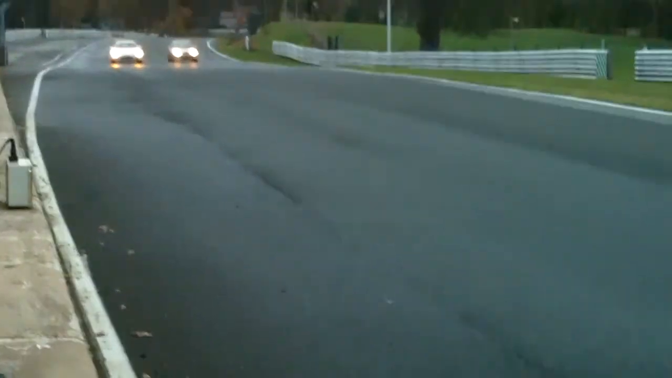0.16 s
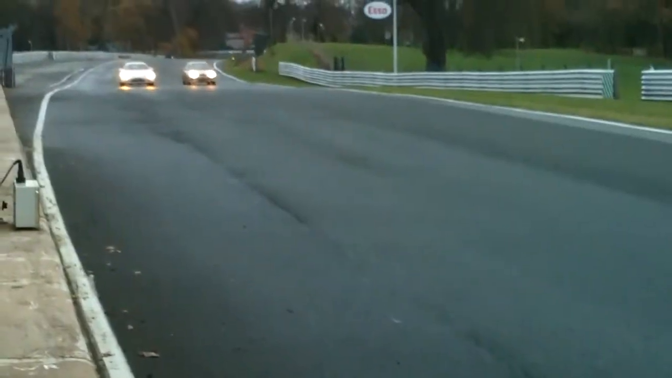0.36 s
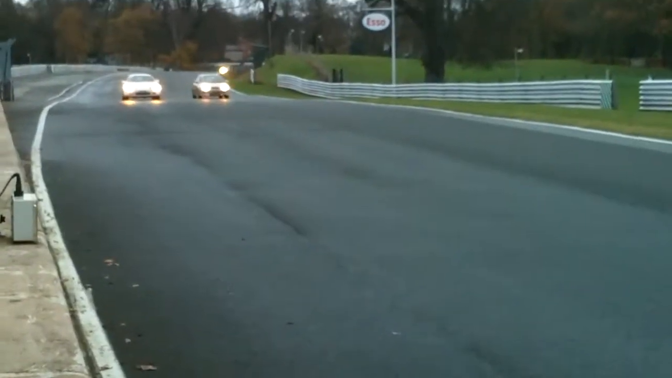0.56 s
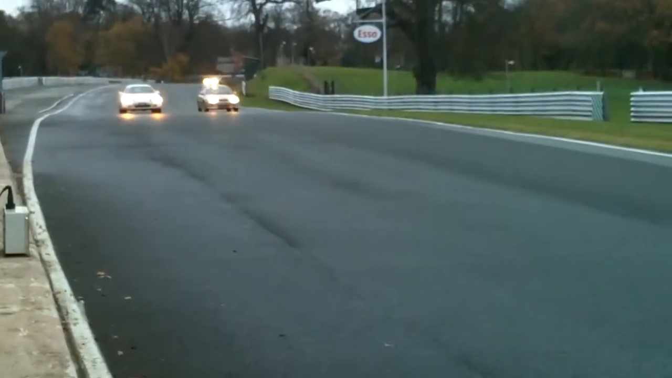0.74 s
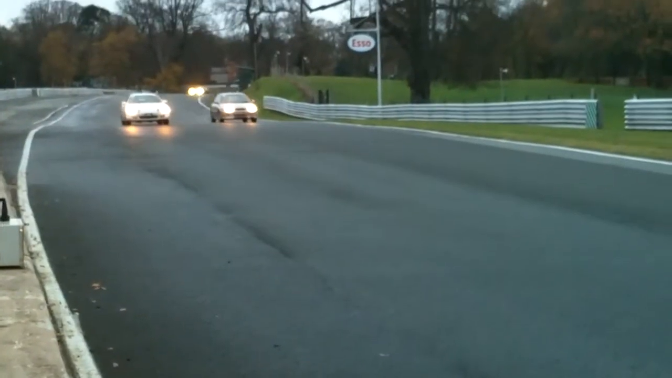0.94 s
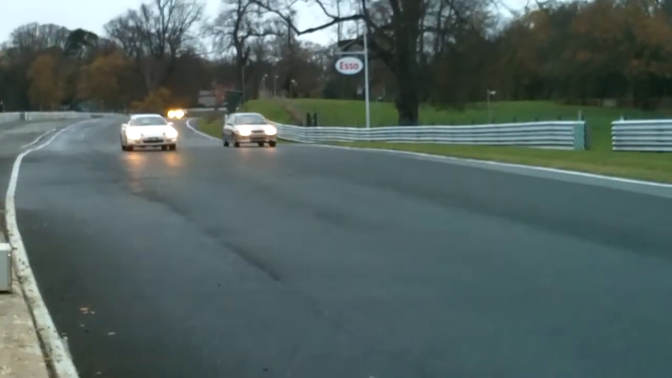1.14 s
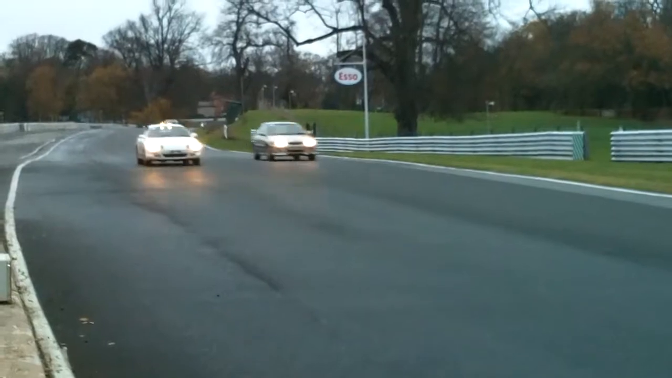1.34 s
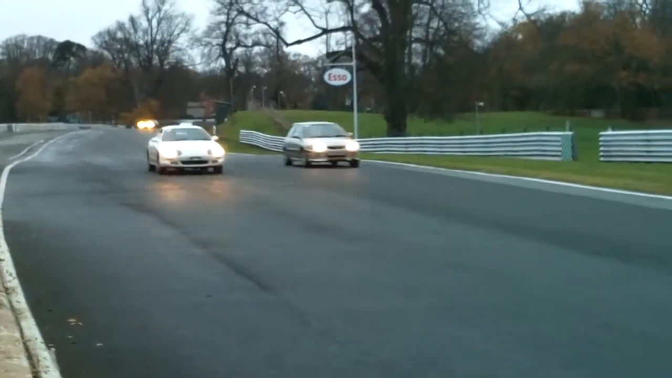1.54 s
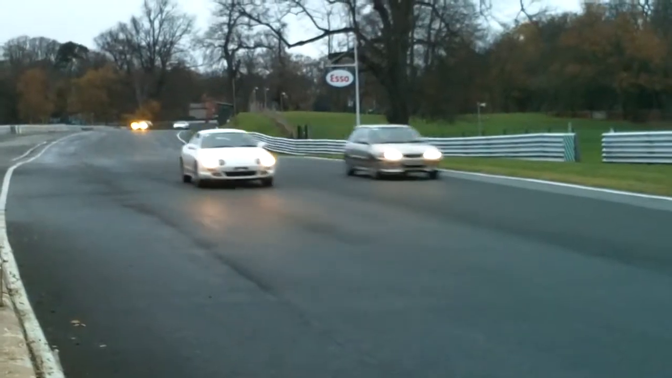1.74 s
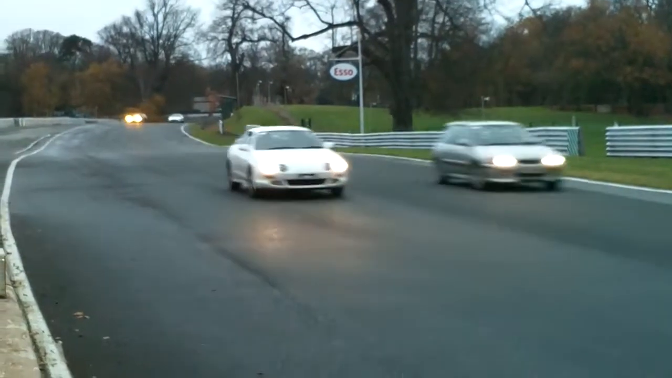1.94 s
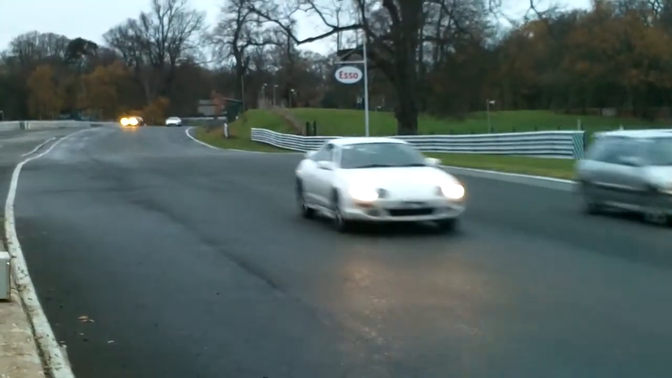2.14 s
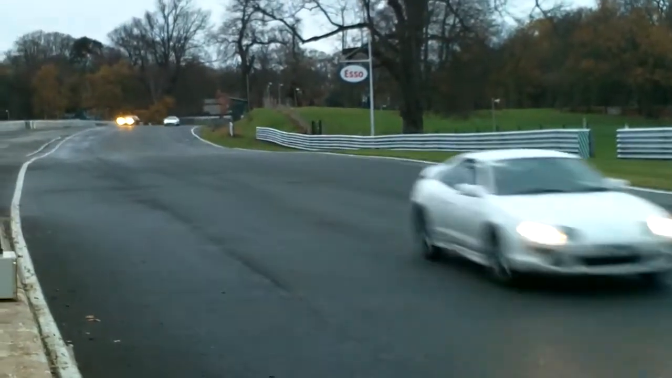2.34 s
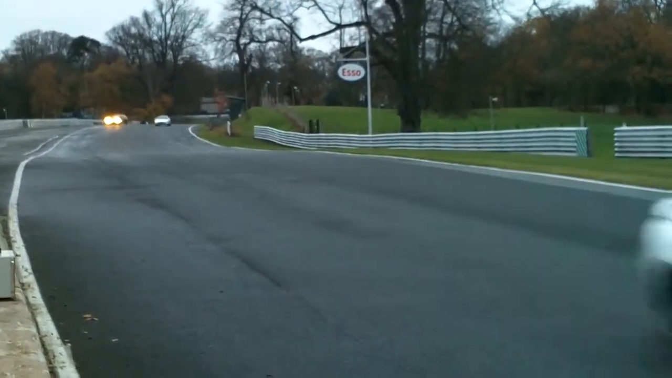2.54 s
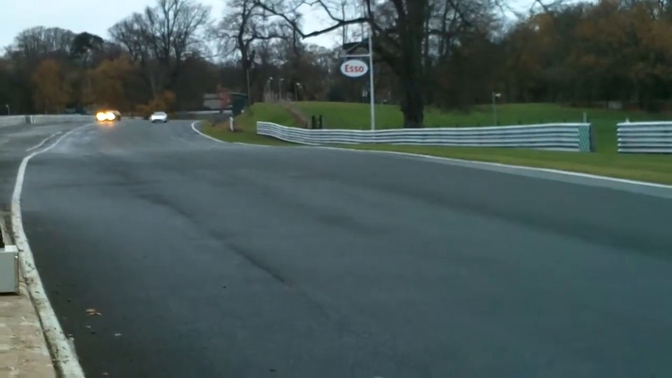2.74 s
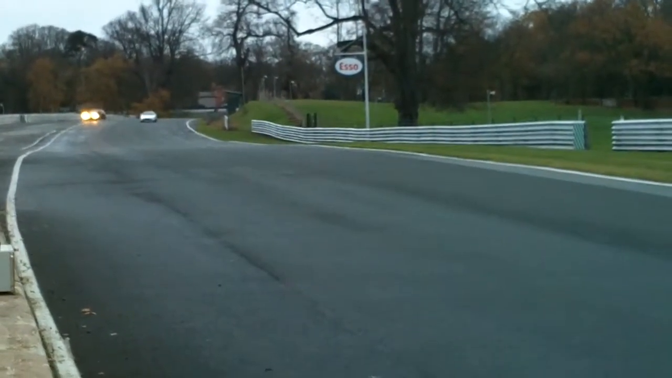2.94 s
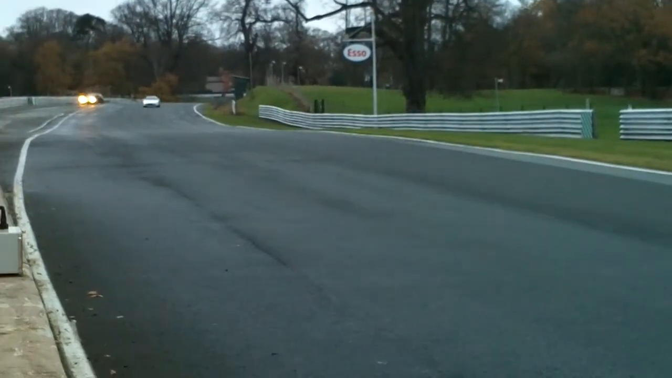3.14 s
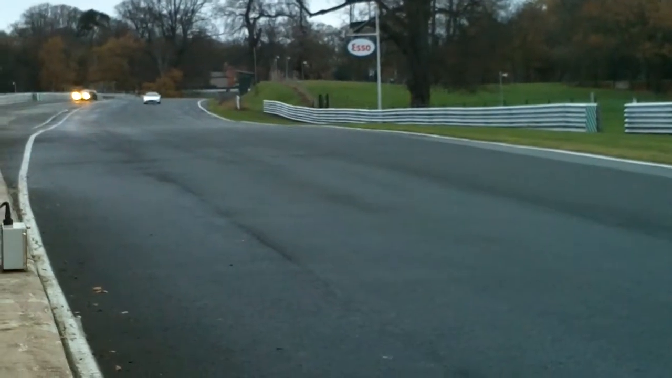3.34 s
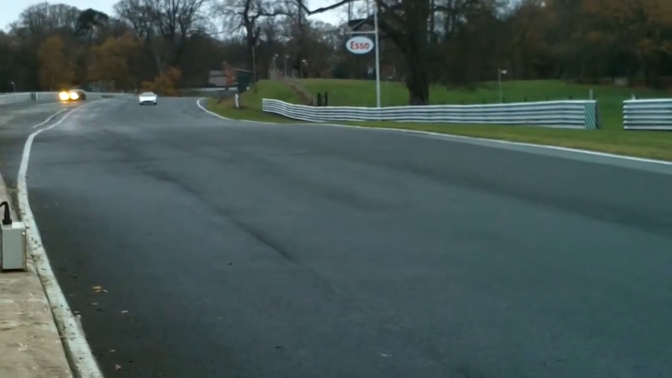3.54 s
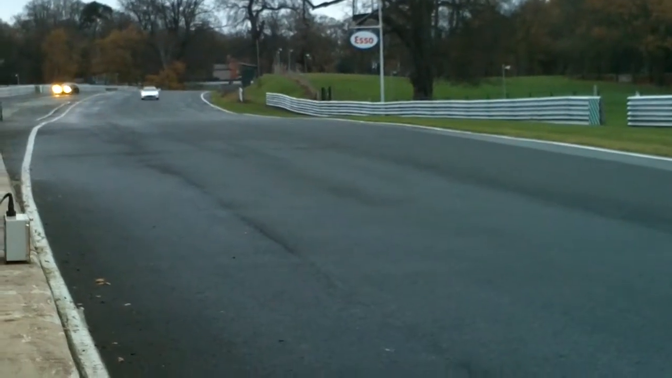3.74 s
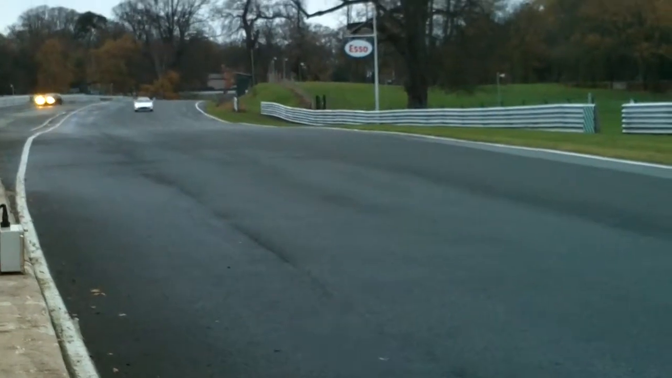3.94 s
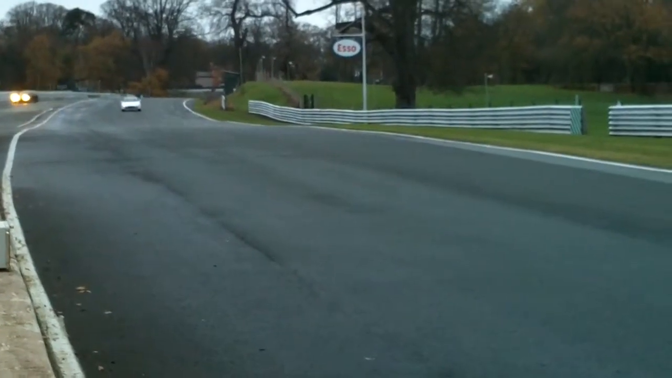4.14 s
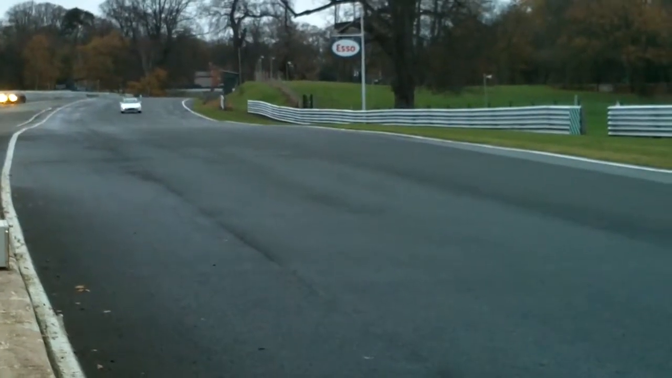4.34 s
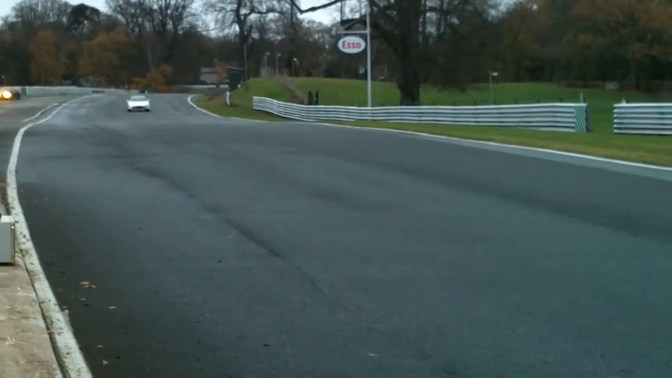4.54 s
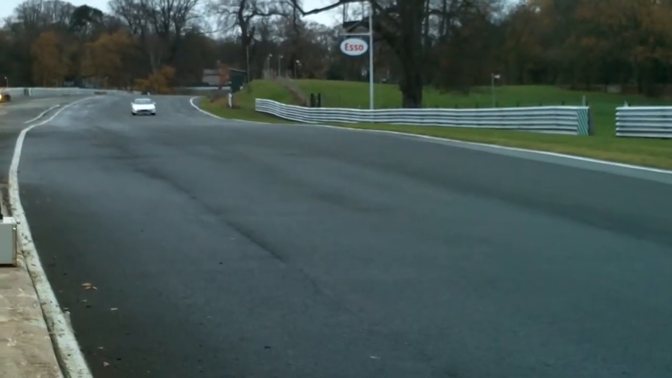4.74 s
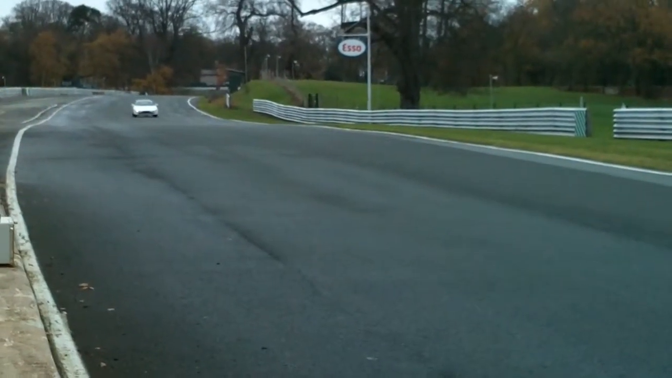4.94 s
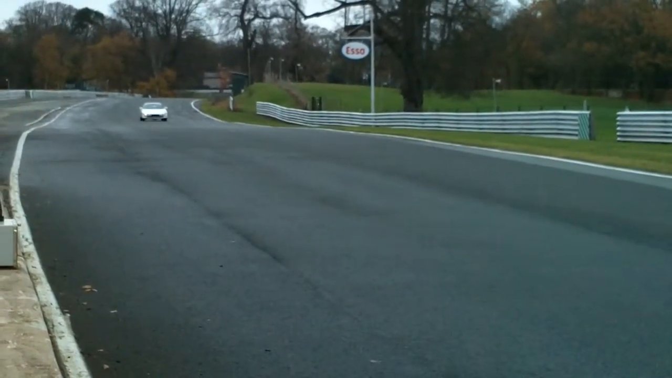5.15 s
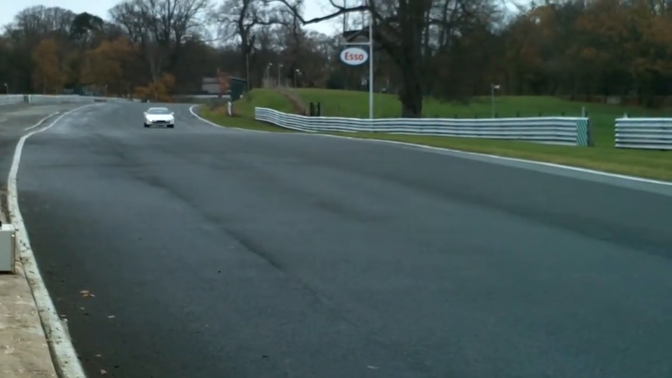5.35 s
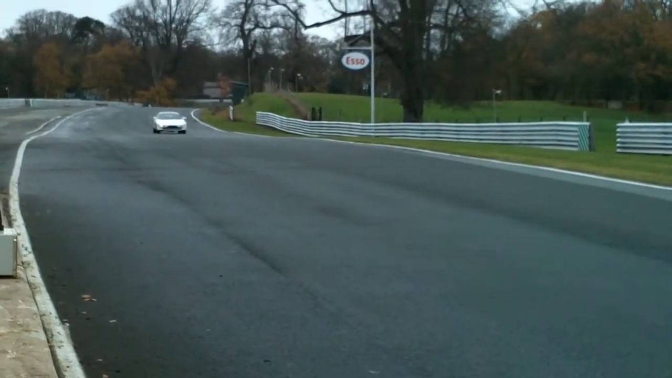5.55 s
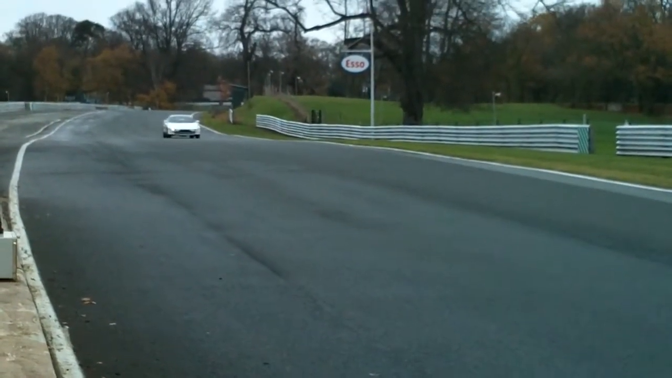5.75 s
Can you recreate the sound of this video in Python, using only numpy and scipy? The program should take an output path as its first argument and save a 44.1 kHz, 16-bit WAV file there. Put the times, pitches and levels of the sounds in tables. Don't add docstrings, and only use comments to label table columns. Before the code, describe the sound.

Two hard-driven cars sweep past on a damp race track, engine notes dropping, then a slower wet-tyred car rolls close with faint brake squeaks.

```python
import sys
import numpy as np
from scipy import signal
from scipy.io import wavfile

SR = 44100
rng = np.random.default_rng(int(sys.argv[2]) if len(sys.argv) > 2 else 0)


def log_audio(samples):
    frames = np.atleast_2d(samples).T
    limited = np.clip(frames, -1, 1)
    pcm = np.round(limited * 32767).astype(np.int16)
    wavfile.write(sys.argv[1], SR, pcm)


def gain_from_db(level_db):
    decades = np.asarray(level_db, float) / 20
    return 10 ** decades


N = 255339


def rms_one(x):
    return x / np.sqrt(np.mean(x ** 2) + 1e-20)


def in_time(rows):
    s, *columns = np.transpose(rows)
    return [np.interp(np.arange(N) / SR, s, column) for column in columns]


def bell(peak_s, half_s):
    return np.exp(-((np.arange(N) / SR - peak_s) / half_s) ** 2)


def sounding(rows, fade_s=0.12):
    t = np.arange(N) / SR
    inside_s = np.minimum(t - rows[0][0], rows[-1][0] - t)
    return np.clip(inside_s / fade_s + 1, 0, 1)


def drift(rate_hz):
    r = np.exp(-2 * np.pi * rate_hz * 40 / SR)
    noise = rng.standard_normal(N // 40 + 2002)
    slow = signal.lfilter([1], [1, -2 * r, r * r], noise)[2000:]
    return np.interp(np.arange(N) / 40, np.arange(len(slow)), rms_one(slow))


def band_noise(noise, low_hz, high_hz):
    return signal.sosfilt(signal.butter(2, [low_hz, high_hz], "band", fs=SR, output="sos"), noise)


def turns(hz, jitter):
    return 2 * np.pi * np.cumsum(hz * (1 + jitter * drift(14.8))) / SR


def partial(phase, level_db, wobble_db, scatter):
    level = np.sqrt(2) * gain_from_db(level_db + wobble_db * drift(7.6))
    return level * np.cos(phase + scatter * drift(8.1))


def coupe():
    # time in seconds, shaft speed as heard in Hz
    speed = [
        (0.0, 60.68),
        (1.0, 63.0),
        (2.0, 64.92),
        (2.4, 64.65),
        (2.56, 64.14),
        (2.72, 61.84),
        (2.88, 58.07),
        (3.04, 55.1),
        (3.2, 54.9),
    ]
    # multiple of shaft speed, number of the leading part, level against that part in dB
    orders = [(1, 0, -21), (2, 0, -11), (3, 0, 0), (4, 1, 0), (5, 0, -14), (6, 0, -11), (7, 4, -3),
              (8, 4, 0), (12, 3, -6), (13, 2, -1), (14, 2, -5), (15, 3, 0), (17.5, 5, -7), (21, 5, 0),
              (22, 2, -1), (23, 5, -4), (26, 5, -5), (27, 5, -5), (29, 3, -9), (30, 3, -9), (34, 3, -13)]
    # facing time in seconds, peak level in dB, rise in dB per s, fall in dB per s
    parts = [
        (1.952, -25, 10, 4),
        (2.302, -21, 19, 5.5),
        (2.501, -31, 28, 20),
        (2.05, -30.5, 9, 17.5),
        (2.2, -35, 8, 30),
        (2.25, -29, 30, 18),
    ]
    intake_opens_s, intake_shut_db = 1.34, -7.5
    throttle_lifts_s, lift_db_per_s = 2.9, 92.5
    fading_db = 1.17

    hz, = in_time(speed)
    t = np.arange(N) / SR
    gone_db = -lift_db_per_s * np.maximum(t - throttle_lifts_s, 0)
    leads_db = []
    for facing_s, peak_db, rise, fall in parts:
        swell_db = np.minimum(rise * (t - facing_s), fall * (facing_s - t))
        leads_db.append(peak_db + swell_db + gone_db + fading_db * drift(2.04))
    leads_db[3] = leads_db[3] + intake_shut_db * np.clip((intake_opens_s - t) / 0.14, 0, 1)

    shade_db = -7 * np.sqrt(hz.max() - hz) * (np.arange(N) > hz.argmax())
    phase = turns(hz, jitter=0.0029)
    out = 0
    for order, lead, order_db in orders:
        wobble_db = 1.2 if order_db == 0 else 2.5
        shaded = order > 8 and lead != 2
        level_db = order_db + leads_db[lead] + shade_db * shaded
        start_phase = rng.uniform(0, 5.77)
        out = out + partial(order * phase + start_phase, level_db, wobble_db, scatter=0.2 + 0.052 * order)
    return out


def hatchback():
    # time in seconds, firing rate as heard in Hz, level in dB, tailpipe shading in dB
    drive = [(0.0, 165.0, -33, -7.5), (0.6, 164.5, -34, -37), (1.15, 163.3, -35, -7), (1.45, 158, -30, -21),
             (2.0, 156.5, -24.5, -16.5), (2.5, 155.1, -26, -12), (2.65, 154.5, -20.5, -30),
             (2.88, 152.4, -18.5, -13), (3.0, 143.2, -16, -10), (3.12, 135.1, -18, -7.5),
             (3.3, 131.2, -18, -5.5), (3.65, 130.6, -16.5, -7), (4.1, 133, -17.5, -8.5),
             (4.45, 131, -23, -16.5), (4.88, 128.8, -22.5, -15), (5.28, 107.5, -28.5, -7.5),
             (5.5, 110.5, -26, -10.5), (5.79, 142.2, -22.5, -20)]
    # multiple of firing rate, level in dB
    orders = [(0.25, -50.5), (0.5, -24.5), (0.75, -22.5), (1, 0), (1.25, -43.5), (1.5, -36.5),
              (1.75, -23.5), (2, -5), (2.25, -17), (2.5, -39), (2.75, -23), (3, -16), (3.25, -25),
              (3.5, -30), (3.75, -45.5), (4, -21), (4.25, -34.5), (4.5, -38.5), (4.75, -30), (5, -27)]
    third_db, third_shading = -7.5, 1.49
    fading = 0.17

    hz, firing_db, pipe_db = in_time(drive)
    firing_db = firing_db + fading * (pipe_db - pipe_db.max()) * drift(8.9)
    third_lead_db = firing_db + third_db + third_shading * pipe_db
    leads_db = [firing_db, firing_db + pipe_db, third_lead_db]
    phase = turns(hz, jitter=0.003)
    table = dict(map(tuple, orders))
    out = 0
    for order, order_db in table.items():
        lead = int(np.clip(round(order), 1, 3))
        level_db = leads_db[lead - 1] + order_db - table[lead]
        whole = order % 1 == 0
        wobble_db, scatter = (0.7, 0.08) if whole else (2.2, 0.6)
        out = out - partial(order * phase, level_db, wobble_db, scatter)

    puff = ((1 + np.cos(phase)) / 2) ** 16
    spit = puff * gain_from_db(4 * np.cos(phase / 4) + 3 * drift(25))
    bright = band_noise(rng.standard_normal(N), 9500, 15000)
    spitting = gain_from_db(0.88 * third_lead_db - 30) * spit * bright
    dull = band_noise(rng.standard_normal(N), 700, 4000)
    pipe_hiss = gain_from_db(third_lead_db - 8) * (1 + np.cos(phase)) * dull
    return out + spitting + pipe_hiss


def distant():
    # peak time in seconds, half length in seconds, pitch in Hz, glide in Hz per s, peak level in dB
    engines = [(0.35, .3, 208, 10, -37), (0.95, .35, 213, 8, -30), (1.62, .2, 223, 18, -27),
               (2.35, .2, 232, 10, -33), (0.2, .5, 105.5, -2, -42), (1.2, .3, 108.5, 6, -38),
               (1.1, .5, 50.4, 3, -39), (1.05, .2, 299, 55, -34), (1.4, .25, 322, 55, -37),
               (3.4, .25, 280, -12, -38), (3.75, .1, 276, -8, -30), (0.57, .13, 398, 20, -38),
               (3.85, .4, 212.5, -5, -33.5), (4.27, .2, 209, -14, -26), (4.72, .3, 201, -12, -31),
               (5.15, .3, 192.5, -20, -31), (5.74, .16, 185, -6, -26), (4.96, .15, 215.6, 18, -24),
               (5.32, .12, 217, -5, -23.5), (5.64, .2, 224.5, 10, -26.5), (4.5, .1, 62, 8, -36),
               (4.95, .35, 65, 2, -34.5), (5.48, .085, 64, 60, -21), (5.46, .1, 136, -5, -26)]
    drop_db = 7.5
    t = np.arange(N) / SR
    out = 0
    for peak_s, half_s, hz, glide, peak_db in engines:
        level_db = peak_db - drop_db * ((t - peak_s) / half_s) ** 2
        phase = turns(hz + glide * (t - peak_s), jitter=0.0054)
        out = out + partial(phase, level_db, wobble_db=1.5, scatter=0.1)
    return out


def tyre_levels():
    # time in seconds, traffic level in dB, treble lost over the distance in dB
    traffic = [(0.0, -43, 44), (0.4, -40.5, 52.5), (0.95, -37, 53), (1.3, -32.5, 54), (1.55, -29.5, 41.5),
               (1.85, -26, 29), (2.13, -26, 24.5), (2.45, -27, 19.5), (2.75, -31, 18.5),
               (2.88, -33.5, 15.5), (3.02, -37.5, 20.5), (3.45, -39, 27), (3.85, -36.5, 29),
               (4.2, -32, 36.5), (4.55, -33.5, 40.5), (4.82, -37.5, 36), (5.17, -38.5, 32),
               (5.79, -38.5, 23.5)]
    # time in seconds, half length in seconds, lift of roar, hiss, spray in dB
    splashes = [(1.176, 0.34, 0, 4, -6.5), (2.655, 0.023, 0.5, 0.5, 0.5), (2.861, .025, 6, 4.5, 1),
                (3.791, 0.024, -0.5, 3.5, 5), (3.999, 0.016, 6, 6.5, 4.5), (4.195, 0.065, 1, 2.5, 1),
                (4.46, .04, 3, -0.5, -3), (4.549, .03, 1.5, -4.5, 8.5), (5.106, .03, 1, -1.5, 2.5),
                (5.38, 0.12, -0.5, 4, 12.5), (5.524, 0.057, -0.5, 16.5, 12), (5.639, 0.049, 1.5, 9, 4.5),
                (5.79, .025, -1.5, 5, 3)]
    hiss_front_db, hiss_rear_db = -11, -16
    turn_s, turn_width_s = 2.97, 0.05

    level_db, loss_db = in_time(traffic)
    behind = (1 + np.tanh((np.arange(N) / SR - turn_s) / turn_width_s)) / 2
    hiss_db = level_db + hiss_front_db + (hiss_rear_db - hiss_front_db) * behind
    rumble_db = -44 + 0.3 * level_db + 3.5 * drift(0.91)
    rumble_db = rumble_db + 4.5 * bell(5, 0.95)
    levels = np.array([rumble_db, level_db, hiss_db, level_db - loss_db])
    for s, half_s, *lift_db in splashes:
        levels[1:] += np.array(lift_db)[:, None] * bell(s, half_s)
    return levels


def asphalt_echo(x):
    # start in seconds, end in seconds, extra path at start in ms, at end in ms, strength from 0 to 1
    bounces = [
        (-0.3, 1.392, 0.68, 0.62, 0.55),
        (2.94, 3.45, 0.3, 0.14, 0.5),
        (3.68, 4.6, 0.52, 0.47, 0.17),
    ]
    fade_s = 0.06
    t = np.arange(N) / SR
    out = 0
    for start, end, first_ms, last_ms, strength in bounces:
        lag_ms = np.interp(t, [start, end], [first_ms, last_ms])
        gate = np.clip(np.minimum(t - start, end - t) / fade_s, 0, 1)
        dull_hz = 0.9 * 1000 / last_ms
        r = np.exp(-2 * np.pi * dull_hz / SR)
        dulled = signal.lfilter([1 - r], [1, -r], x)
        bounce = np.interp(np.arange(N) - lag_ms * SR / 1000, np.arange(N), dulled)
        out = out + strength * gate * bounce
    return out


def road():
    rule_hz = (230, 1300, 4000, 8800)
    # pitch in Hz, level in dB per Hz
    colour = [(20, -14.5), (92, -12), (137, -9), (171, -6), (259, -14.5), (342, -15), (614, -20),
              (958, -17), (1920, -15.5), (2680, -24), (4070, -24.5), (5530, -28), (6190, -34.5),
              (9500, -44), (15500, -64)]
    road_db, patchy_db = -27, 1.16

    swell_db = tyre_levels()
    swell_db = swell_db - 10 * np.log10(np.mean(10 ** (swell_db / 10), axis=1, keepdims=True))
    colour_hz, colour_db = np.transpose(colour)
    reference_db = np.interp(np.log(1200), np.log(colour_hz), colour_db)
    edges = 20 * 2 ** np.arange(0, 9.9, 1 / 3)
    white = rng.standard_normal((2, N))
    together = drift(9)
    out = 0
    for k, (low, high) in enumerate(zip(edges, edges[1:])):
        hz = np.sqrt(low * high)
        place = np.interp(np.log(hz), np.log(rule_hz), np.arange(4))
        below = min(int(place), 2)
        level_db = swell_db[below] + (place - below) * (swell_db[below + 1] - swell_db[below])
        level_db = level_db + np.interp(np.log(hz), np.log(colour_hz), colour_db) - reference_db
        flicker_db = patchy_db * (0.36 * together + drift(9.2))
        out = out + gain_from_db(level_db + flicker_db) * band_noise(white[k % 2], low, high)
    return gain_from_db(road_db + 9.5) * (out + asphalt_echo(out))


def wet_tread():
    # pitch in Hz, width in Hz, level in dB
    grooves = [
        (4850, 330, -43),
        (4100, 600, -48),
        (6200, 500, -56),
    ]
    # time in seconds, level in dB
    span = [
        (5.06, -13),
        (5.13, -1.5),
        (5.3, 5),
        (5.4, 7.5),
        (5.46, -2),
        (5.6, -3.5),
        (5.79, -5),
    ]
    falls = rng.random(N) < 3000 / SR
    grain_db = 1.8 * np.minimum(rng.exponential(1, N), 4)
    grains = falls * gain_from_db(grain_db) * rng.choice([-1, 1], N)
    out = 0
    for hz, width_hz, db in grooves:
        ring = signal.lfilter(*signal.iirpeak(hz, hz / width_hz, SR), grains)
        out = out + gain_from_db(db) * rms_one(ring)
    return out * gain_from_db(in_time(span)[0]) * sounding(span)


def squeaks():
    # time in seconds, peak level in dB, pitch in Hz
    pads = [
        (5.5717, -39, 6400),
        (5.6346, -39, 6200),
        (5.7332, -42, 6230),
    ]
    t = np.arange(N) / SR
    out = 0
    for s, db, hz in pads:
        out = out + gain_from_db(db + 2.5) * bell(s + 0.006, 0.0052) * np.sin(2 * np.pi * hz * t)
    return out


def scene():
    engines = coupe() + hatchback() + distant()
    tyres = road() + wet_tread()
    return (engines + tyres + squeaks())[None]


def top_cut(x):
    return signal.sosfilt(signal.butter(12, 15840, fs=SR, output="sos"), x)


def record(dry):
    # pitch in Hz, width in Hz
    notches = [
        (2715, 800),
        (5500, 1810),
        (7880, 4470),
        (10930, 1200),
    ]
    for hz, width_hz in notches:
        dry = signal.lfilter(*signal.iirnotch(hz, hz / width_hz, SR), dry)
    dry = dry - 0.6 * signal.lfilter(*signal.iirpeak(12800, 12800 / 900, SR), dry)
    whine = gain_from_db(-85.5) * np.sin(2 * np.pi * 11550 * np.arange(N) / SR)
    hiss = gain_from_db(-89.5) * rng.standard_normal(N)
    dry = dry + whine + hiss
    top_hz = 15290
    mix = signal.sosfilt(signal.ellip(12, 0.5, 70, top_hz, fs=SR, output="sos"), dry)
    return top_cut(mix)


dry = scene()
out = record(dry)
log_audio(out)
```